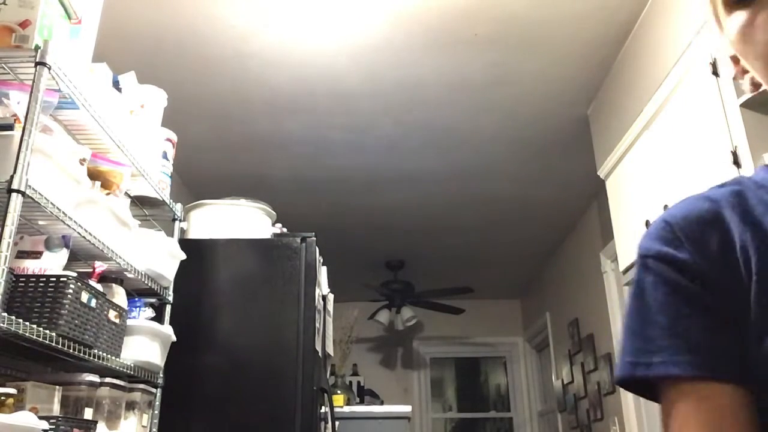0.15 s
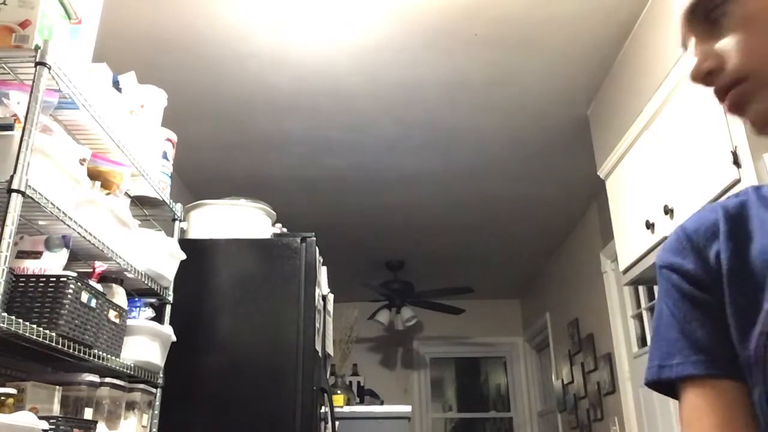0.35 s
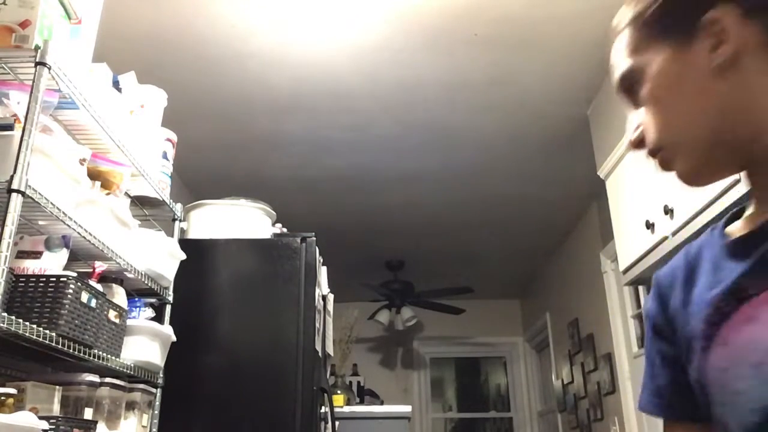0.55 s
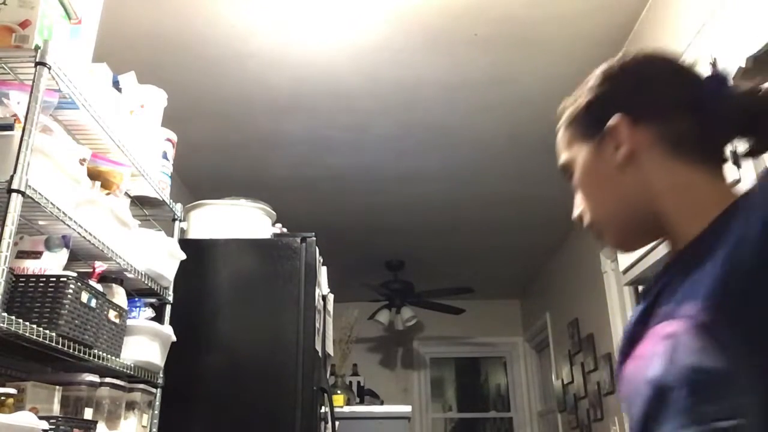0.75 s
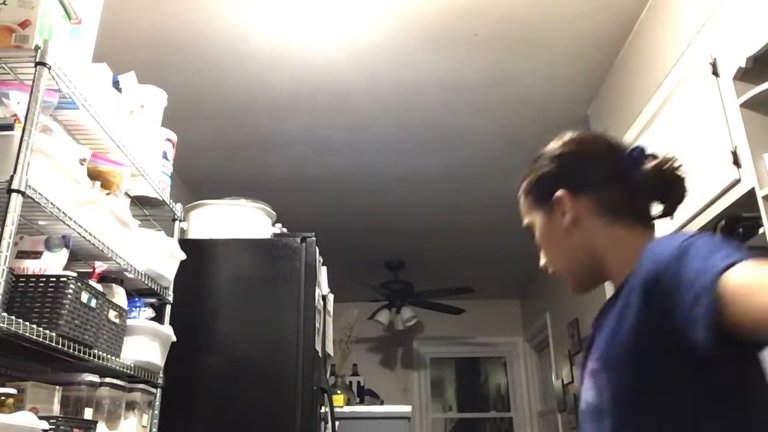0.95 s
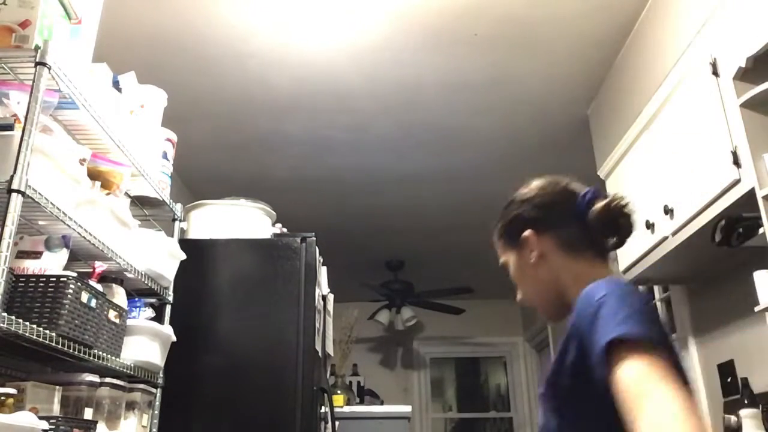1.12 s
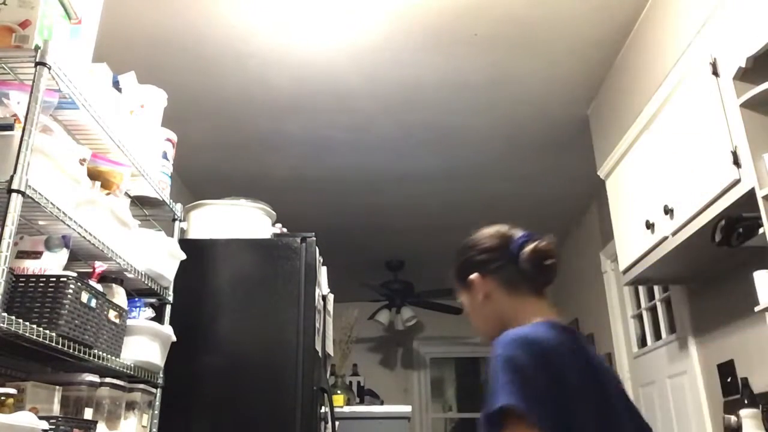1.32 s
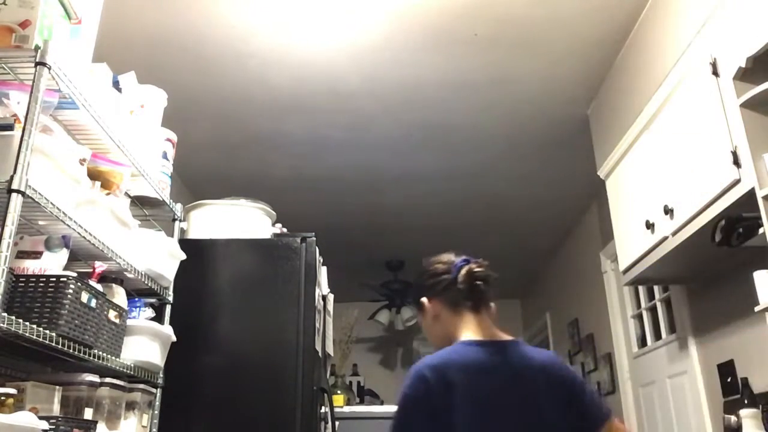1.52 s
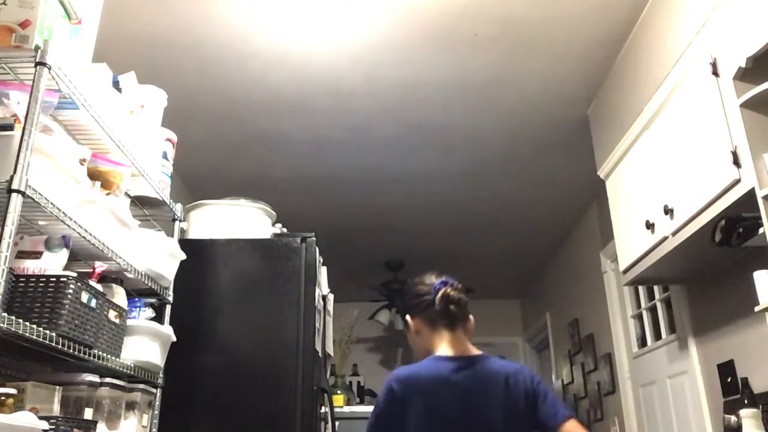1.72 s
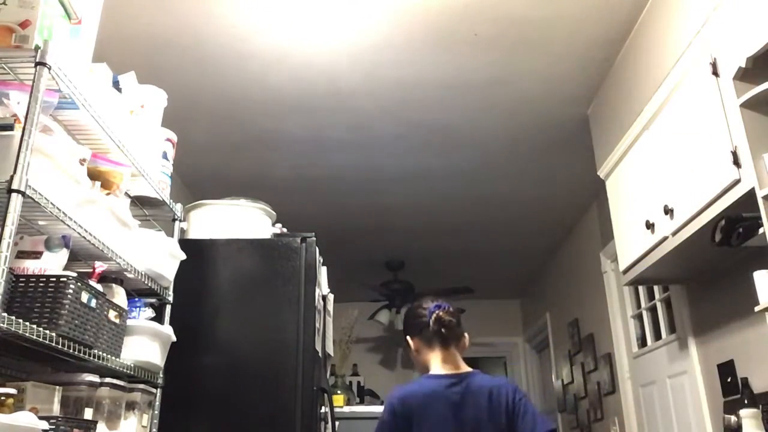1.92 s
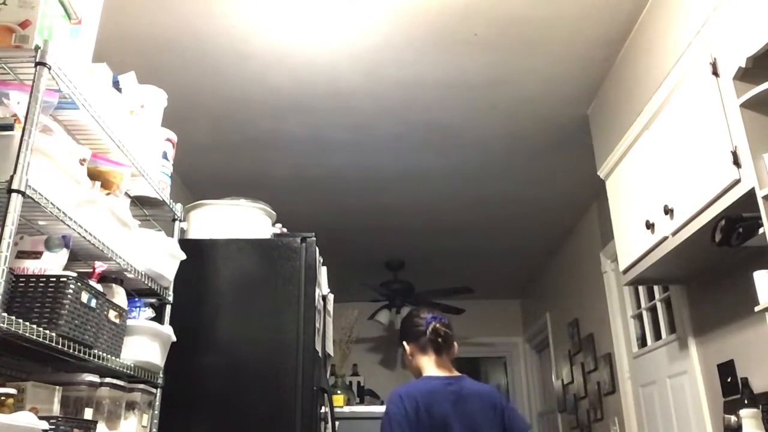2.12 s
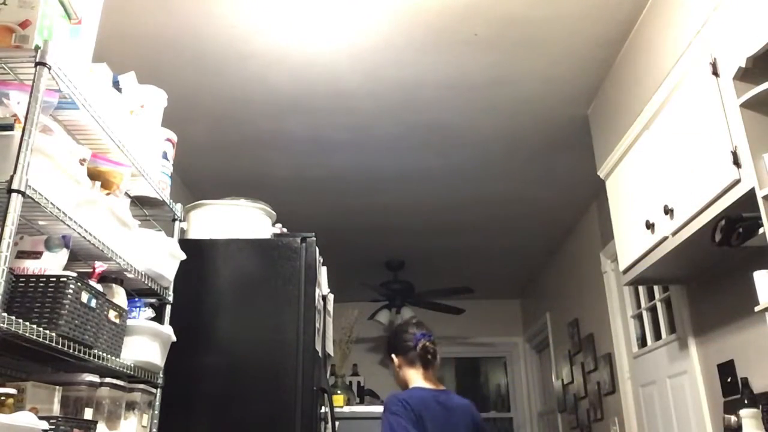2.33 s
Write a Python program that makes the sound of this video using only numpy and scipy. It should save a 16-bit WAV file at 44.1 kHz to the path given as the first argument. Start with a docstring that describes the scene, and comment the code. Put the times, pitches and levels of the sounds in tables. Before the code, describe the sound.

Two loud clattering knocks of a phone set on a counter, then soft footfalls over fridge hum.

```python
"""Phone set down on a kitchen counter

Two hard knocks, a few bounces and a short slide: snaps, fast-dying noise, ringing modes and tiny slips.
Three dull footfalls follow, each shaking something loose, then a faint fourth and a sharp little click;
they are late-arriving bass modes, noise clacks and rattles, and bright pulses with fizzing tails.
A refrigerator hums throughout as wavering tones over a low rush; the small room rings briefly."""
import sys
import numpy as np
from scipy import signal
from scipy.fft import rfft, irfft
from scipy.io import wavfile

SR = 44100
rng = np.random.default_rng(int(sys.argv[2]) if len(sys.argv) > 2 else 0)


def master_out(mix):
    """Clip the mix to full scale and print it as 16-bit PCM to the path in sys.argv[1]."""
    frames = np.transpose(np.atleast_2d(mix))
    ceiling = np.clip(frames, -1, 1)
    pcm = np.round(ceiling * 32767).astype(np.int16)
    wavfile.write(sys.argv[1], SR, pcm)


N = 105840  # 2.4 s
T = np.arange(N) / SR
HZ = np.fft.rfftfreq(N, 1 / SR)
SOUND_SIZE = SR // 2  # each struck sound lasts half a second


def amp(db):
    """Decibels to gain."""
    return 10 ** (np.asarray(db) / 20)


def unit(x):
    """Scales to rms 1."""
    return x / np.sqrt(np.mean(x ** 2) + 1e-20)


def read(table, hz, axis=1):
    """Reads one column of a table along a log-frequency axis."""
    columns = np.transpose(table)
    return np.interp(np.log(hz + 1), np.log(columns[0] + 1), columns[axis])


def colour(table):
    """Gain that gives unit white noise the table's level per octave."""
    white_to_octave = np.sqrt(SR / 2 / np.log(2) / np.maximum(HZ, 20))
    return amp(read(table, HZ)) * white_to_octave


def add(mix, s, sound):
    """Mixes a sound in at time s, cutting whatever runs past the end."""
    part = mix[max(round(s * SR), 0):][:len(sound)]
    part += sound[:len(part)]


def filtered_noise(gain):
    """Steady white noise shaped by a gain over frequency."""
    return irfft(rfft(rng.standard_normal(N)) * gain, N)


def waver(hz):
    """Slow random drift of rms 1, with a soft upper limit near hz."""
    return unit(filtered_noise(np.exp(-(HZ / hz) ** 2)))


def dull(x, hz):
    """Gentle one-pole low-pass: a softer contact."""
    r = np.exp(-2 * np.pi * hz / SR)
    return signal.lfilter([1 - r], [1, -r], x)


def causal(x, gain):
    """Colours a sound with a minimum-phase filter, so nothing rings ahead of it."""
    cepstrum = irfft(np.log(gain), N)
    # fold the time-reversed half forward
    cepstrum[1:N // 2] *= 2
    cepstrum[N // 2 + 1:] = 0
    response = np.exp(rfft(cepstrum))
    return irfft(rfft(x, N) * response, N)[:SOUND_SIZE]


def dying(table, gain):
    """Countless overlapping resonances: even noise whose bands each die at their own speed."""
    hz = np.fft.rfftfreq(SOUND_SIZE, 1 / SR)
    spectrum = rfft(rng.choice([-1., 1.], SOUND_SIZE))
    centres = np.geomspace(50, 16000, 10)  # Hz
    noise = np.zeros(SOUND_SIZE)
    for centre, pick in zip(centres, np.eye(len(centres))):
        # overlapping weights crossfade between neighbouring bands
        weight = read(np.c_[centres, pick], hz)
        band = irfft(spectrum * weight, SOUND_SIZE)
        t60 = read(table, centre, axis=2)
        noise += band * 1e-3 ** (T[:SOUND_SIZE] / t60)
    return causal(noise, gain)


def snap(table):
    """A single pulse with the table's levels over one millisecond."""
    return causal([np.sqrt(SR / 1000)], colour(table))


def mode(hz, db, t60, lag_s):
    """A resonance that swells in around its arrival time and then dies away."""
    t = T[:SOUND_SIZE] - lag_s
    swell = np.sin(np.pi / 2 * np.clip(t / lag_s + .5, 0, 1)) ** 2
    return amp(db - 60 * t / t60) * swell * np.sin(2 * np.pi * hz * t)


def arrival(hz, lag_s, power):
    """Travel time of a bending wave, lag_s at 100 Hz: low notes come late."""
    return lag_s * (100 / hz) ** power


# the room's reverberation: (frequency [Hz], relative colour [dB], t60 [s])
ROOM_TAIL = [(60, -15, 1), (231, 11.5, 0.25), (996, 1.5, 0.35), (3060, -3.5, 0.41), (8000, 2, 0.25),
             (16200, 1, 0.17)]
ROOM_DELAY_S = .006


def room(x):
    """The kitchen's short reverberation: a delayed, unit-energy tail of dying noise."""
    tail = dying(ROOM_TAIL, amp(read(ROOM_TAIL, HZ)))
    out = np.zeros(N)
    add(out, ROOM_DELAY_S, signal.fftconvolve(x, tail / np.linalg.norm(tail)))
    return out


# refrigerator tones: (frequency [Hz], rms level [dB], unsteadiness [0-1])
FRIDGE_TONES = [(56.5, -54, 0), (81, -50, .5), (86.3, -62.5, 1), (113.8, -52.5, 0.23), (205.2, -54, 0.01),
                (352.7, -60, 0.7), (1075, -82.5, .5)]
# low rush of the room: (frequency [Hz], level per octave [dB])
ROOM_RUSH = [(20, -100.5), (32, -68), (45, -76.5), (80, -43.5), (140, -50), (250, -57.5), (380, -56.5),
             (600, -62.5), (1000, -72), (1600, -77.5), (2600, -77.5), (5000, -79.5), (9500, -80),
             (13000, -81), (16000, -82)]
HUM_WAVER_HZ = 3.1


def fridge():
    """Compressor tones wavering in strength and phase, over the low rush of the room."""
    out = filtered_noise(colour(ROOM_RUSH))
    for hz, db, unsteady in FRIDGE_TONES:
        drift = waver(HUM_WAVER_HZ) + 1j * waver(HUM_WAVER_HZ)
        turn = np.exp(2j * np.pi * (hz * T + rng.random()))
        tone = ((1 + unsteady * drift) * turn).real
        out += amp(db) * unit(tone)
    return out


# blows on the counter: (time [s], level [dB], extra ring level [dB], dull above [Hz],
# contact place [0 first - 1 second], crack level relative to the blow [dB], contact time [s])
BLOWS = [(.2367, 0, -2, 9130, 0.069, -0.5, .0008), (0.3676, -10, -26.5, 2400, 1, -4.5, 0.0017),
         (.3738, -1.5, -1.5, 5550, 1, -4, 0.0011), (0.414, -16.5, 3.5, 3020, 1, -23, 0.0028),
         (0.4283, -18, -5.5, 2840, 0, -4, 0.0029), (0.4764, -21, 3.5, 2200, 0.3, -20, 0.0024)]
# modes of counter and phone, before each blow's level:
# (frequency [Hz], level struck at the first place [dB], level at the second [dB], t60 [s])
COUNTER_MODES = [(81.1, -9, -22, .2), (107.3, -6.5, -11, 0.14), (174, -11.5, -14.5, 0.23),
                 (222.8, -19.5, -39, 0.13), (281.4, -15.5, -8.5, 0.27), (348.5, -8.5, -21.5, 0.15),
                 (445, -27.5, -16.5, 0.27), (463.4, -13, -20.5, 0.18), (497.8, -25.5, -19.5, 0.13),
                 (555, -19.5, -28, 0.26), (697.3, -17.5, -23.5, .18), (711.3, -14, -19, 0.14),
                 (790, -16.5, -28, 0.058), (1158, -25.5, -19.5, 0.068), (1365, -14.5, -17, .07),
                 (1771, -24.5, -21, 0.062), (2560, -22, -23, 0.048), (3337, -38, -48, 0.04),
                 (4522, -29, -37, 0.022)]
# dense short ring of phone and counter, before each blow's level:
# (frequency [Hz], level per octave [dB], t60 [s])
CLATTER_RING = [(40, -54, 0.11), (160, -18, 0.16), (414, -12, 0.13), (755, -13, 0.088), (900, -22.5, .06),
                (1020, -13, 0.046), (1320, -15.5, .05), (1620, -19, .045), (2260, -22, 0.033),
                (2450, -23.5, 0.035), (2890, -22.5, .04), (4070, -30.5, .035), (6660, -44, .04),
                (14200, -43, 0.033)]
# snap of contact, before the crack and blow levels: (frequency [Hz], level per octave over 1 ms [dB])
CRACK_SNAP = [(40, -63.5), (300, -20.5), (900, -25), (2500, -19.5), (5800, -26.5), (7200, -35),
              (16000, -34)]
COUNTER_LAG_S, COUNTER_LAG_POWER = 0.01658, 1.7  # lag at 100 Hz; steepness
KNOCK_WET_DB = -11.5


def knocks():
    """Each blow snaps, clatters and sets the counter and phone ringing; soft bounces lose the treble."""
    out, crack = np.zeros(N), snap(CRACK_SNAP)
    for s, db, ring_db, dull_hz, place, crack_db, contact_s in BLOWS:
        bright = np.zeros(N)
        onset = np.minimum(T[:SOUND_SIZE] / contact_s, 1)
        add(bright, s, dying(CLATTER_RING, colour(CLATTER_RING)) * onset)
        add(bright, s, amp(crack_db) * crack)
        bright = amp(db) * dull(dull(bright, dull_hz), dull_hz)
        out += bright + amp(KNOCK_WET_DB) * room(bright)
        for hz, first_db, second_db, t60 in COUNTER_MODES:
            level = db + ring_db + np.interp(place, [0, 1], [first_db, second_db])
            ring = mode(hz, level, t60, arrival(hz, COUNTER_LAG_S, COUNTER_LAG_POWER))
            softness = 1 + (hz / dull_hz) ** 2  # same loss as the two low-passes
            add(out, s, ring / softness)
    return out


# scrape of the sliding phone, before the stroke shapes it: (frequency [Hz], level per octave [dB])
SCRAPE = [(60, -54), (200, -49), (310, -41), (600, -47), (900, -53), (1200, -47.5), (1400, -44.5),
          (1600, -55), (2600, -56.5), (4000, -63), (6700, -70), (7800, -69.5), (10000, -74.5), (16000, -74)]
SLIDE_START_S, SLIDE_END_S, SLIDE_RISE_S, SLIDE_FALL_S = 0.4, 0.6885, 0.15, 0.078
SLIPS_PER_S, SLIDE_UNEVEN_DB, SLIDE_UNEVEN_HZ = 5000, 1.05, 45  # mean rate; rms; upper limit


def slide():
    """Tiny slips of the case over the counter, under one short uneven stroke."""
    slip_now = rng.random(N) < SLIPS_PER_S / SR
    slips = unit(rng.standard_normal(N) * slip_now)
    grip = amp(SLIDE_UNEVEN_DB * waver(SLIDE_UNEVEN_HZ))
    rise = np.clip((T - SLIDE_START_S) / SLIDE_RISE_S, 0, 1)
    fall = np.clip((SLIDE_END_S - T) / SLIDE_FALL_S, 0, 1)
    scrape = irfft(rfft(slips * rise * fall * grip) * colour(SCRAPE), N)
    return scrape + amp(KNOCK_WET_DB) * room(scrape)


# footfalls: (time [s], thump level [dB], clack level [dB])
FOOTFALLS = [(.9945, 1, -4.5), (1.4377, -2, 1.5), (1.7993, -6, -2.5), (2.1, -15, -20)]
# what the footfalls shake, before the thump level: (frequency [Hz], level [dB], t60 [s])
BOARD_MODES = [(86.5, -23, 0.31), (118, -37.5, 0.66), (172.7, -28, 0.326), (206.7, -40.5, .28),
               (274.4, -40, 0.39), (322.3, -34.5, 0.25), (346, -37, 0.29), (390.5, -39, 0.17),
               (469, -37, 0.19), (548, -41, 0.21), (613, -44.5, 0.3), (708, -40.5, 0.12),
               (1398, -53.5, 0.16)]
# clack of a footfall, before the clack level: (frequency [Hz], level per octave [dB], t60 [s])
FOOT_CLACK = [(60, -45.5, 0.17), (150, -43, 0.1), (462, -39.5, 0.12), (770, -41, 0.2), (1071, -46.5, 0.18),
              (1850, -41.5, 0.14), (2580, -43.5, 0.098), (3100, -46.5, .07), (3360, -56.5, 0.24),
              (5900, -68, 0.15), (14800, -87, .1)]
# soft weight on the floor: (time [s], frequency [Hz], level [dB], t60 [s])
SOFT_THUDS = [(1.755, 59.5, -24.5, .22), (1.845, 72, -32, 0.16)]
# loose things rattling: (time [s], level [dB], dull above [Hz])
RATTLE_HITS = [(1.004, -8, 12000), (1.053, -8, 9000), (1.4923, 0.5, 8000), (1.5162, -6, 8000),
               (1.857, 1, 9000), (1.878, -4.5, 8000)]
# noise of the loose things, before each hit's level: (frequency [Hz], level per octave [dB], t60 [s])
RATTLE_NOISE = [(600, -55, 0.088), (1500, -70, .12), (2380, -50.5, 0.099), (3330, -62, 0.14),
                (5070, -58.5, 0.17), (5160, -57, .1), (6600, -64, .1), (7700, -61, 0.068),
                (8850, -67, 0.039), (15000, -69, 0.053)]
# what the loose things ring with, before each hit's level: (frequency [Hz], level [dB], t60 [s])
JINGLE_MODES = [(5230, -59, 0.032), (7700, -65.5, 0.058), (10700, -69, 0.038)]
BOARDS_LAG_S, BOARDS_LAG_POWER = 0.0316, 1.268  # lag at 100 Hz; steepness
CLACK_RISE_S, THUD_RISE_S = 0.0017, 0.0225
STEP_WET_DB = -9


def steps():
    """A clack, then a thump that falls in pitch as the slow bass arrives; loose things rattle after it."""
    bright, body = np.zeros(N), np.zeros(N)
    clack = dying(FOOT_CLACK, colour(FOOT_CLACK))
    clack *= np.minimum(T[:SOUND_SIZE] / CLACK_RISE_S, 1)
    thump = np.zeros(SOUND_SIZE)
    for hz, db, t60 in BOARD_MODES:
        thump += mode(hz, db, t60, arrival(hz, BOARDS_LAG_S, BOARDS_LAG_POWER))
    rattle = dying(RATTLE_NOISE, colour(RATTLE_NOISE))
    for hz, db, t60 in JINGLE_MODES:
        add(rattle, 0, mode(hz, db, t60, 1 / hz))  # swells in over one cycle
    for s, thump_db, clack_db in FOOTFALLS:
        add(bright, s, amp(clack_db) * clack)
        add(body, s, amp(thump_db) * thump)
    for s, hz, db, t60 in SOFT_THUDS:
        add(body, s, mode(hz, db, t60, THUD_RISE_S))
    for s, db, dull_hz in RATTLE_HITS:
        add(bright, s, amp(db) * dull(rattle, dull_hz))
    return body + bright + amp(STEP_WET_DB) * room(bright)


# clicks: (time [s], level [dB], extra snap level [dB])
CLICK_HITS = [(1, -15, -16), (1.176, -19, -12), (1.837, -18, -13), (2.1443, 0, 0.5)]
# snap of a click, before the hit's levels: (frequency [Hz], level per octave over 1 ms [dB])
CLICK_SNAP = [(300, -72), (2800, -66.5), (6000, -49.5), (8000, -45), (9500, -45), (13500, -33),
              (16000, -33)]
# fizzing tail of a click, before the hit's level: (frequency [Hz], level per octave [dB], t60 [s])
CLICK_TAIL = [(797, -71, .2), (2880, -55, 0.14), (3710, -63.5, 0.18), (6640, -59.5, 0.16),
              (7900, -52, 0.12), (9440, -58, 0.16), (11000, -52, .21), (12300, -60, 0.16), (13400, -49, .2),
              (16000, -61, .18)]


def click():
    """Very bright snaps, each with a fizzing room tail; the faint ones are mostly tail."""
    out = np.zeros(N)
    pulse = snap(CLICK_SNAP)
    tail = dying(CLICK_TAIL, colour(CLICK_TAIL))
    for s, db, snap_db in CLICK_HITS:
        add(out, s, amp(db) * (amp(snap_db) * pulse + tail))
    return out


def scene():
    """Everything at the phone's single microphone."""
    return (fridge() + knocks() + slide() + steps() + click())[None]


BASS_CUT_HZ, TREBLE_CUT_HZ = 46, 16300


def record(dry):
    """The small microphone loses the deepest bass and rounds off the loudest peaks; then the band limit."""
    bass_cut = signal.butter(2, BASS_CUT_HZ, "high", fs=SR, output="sos")
    heard = signal.sosfilt(bass_cut, dry)
    rounded = heard / (1 + heard ** 8) ** (1 / 8)  # stays within full scale
    band_limit = signal.firwin(255, TREBLE_CUT_HZ, window=("kaiser", 9), fs=SR)
    return signal.oaconvolve(rounded, band_limit[None], "same")


dry = scene()
out = record(dry)
master_out(out)
```